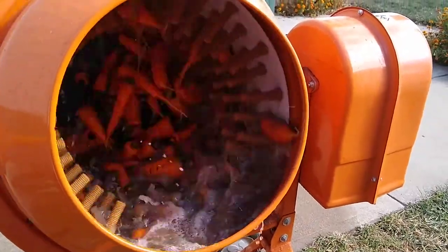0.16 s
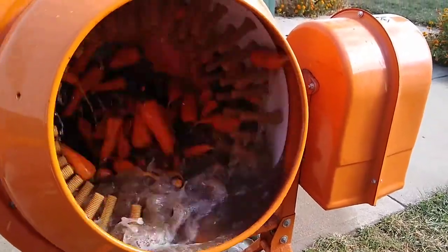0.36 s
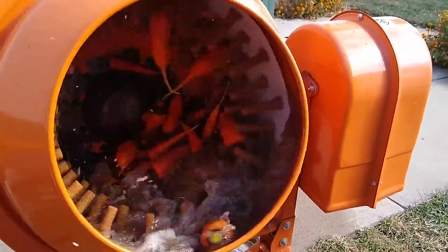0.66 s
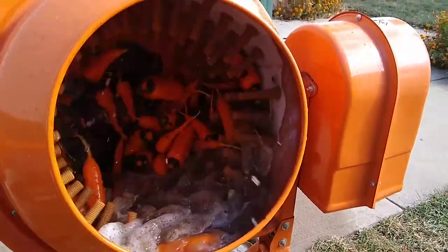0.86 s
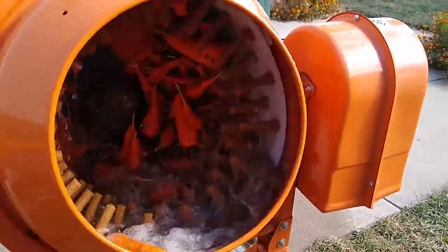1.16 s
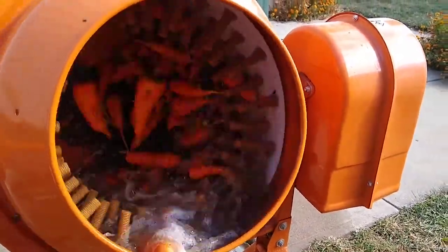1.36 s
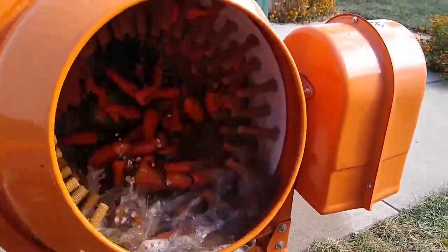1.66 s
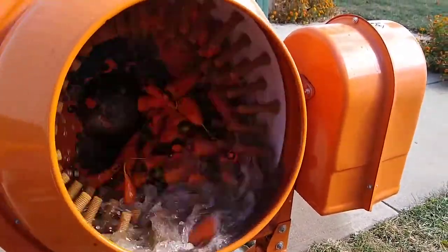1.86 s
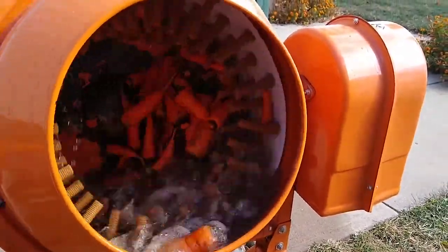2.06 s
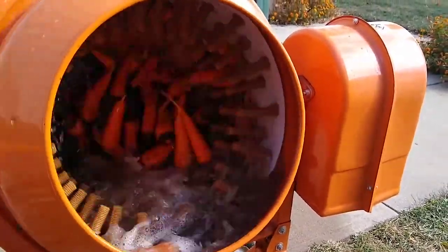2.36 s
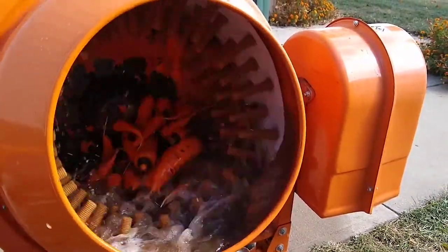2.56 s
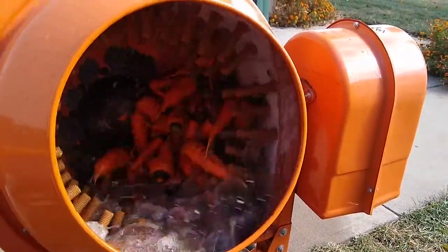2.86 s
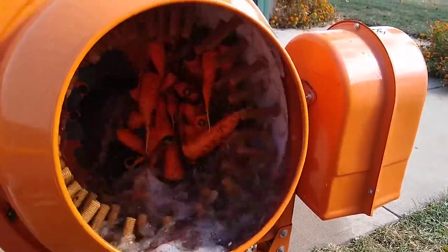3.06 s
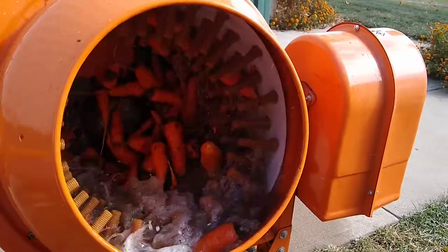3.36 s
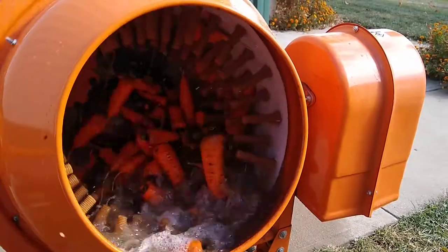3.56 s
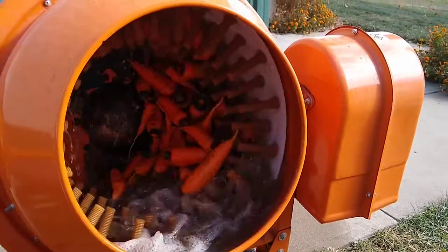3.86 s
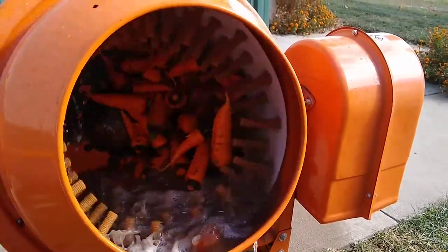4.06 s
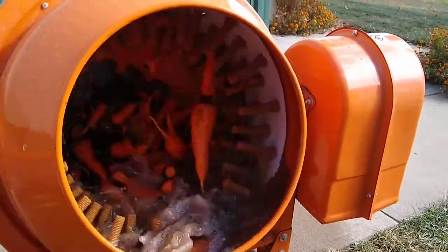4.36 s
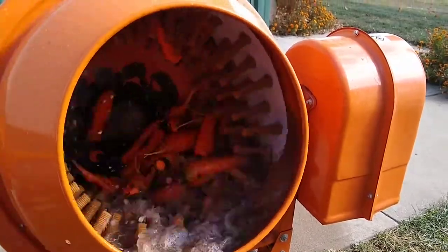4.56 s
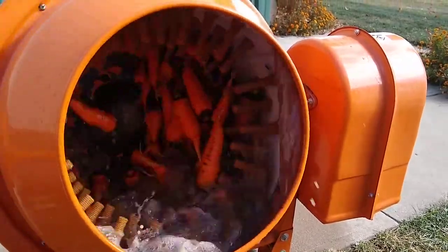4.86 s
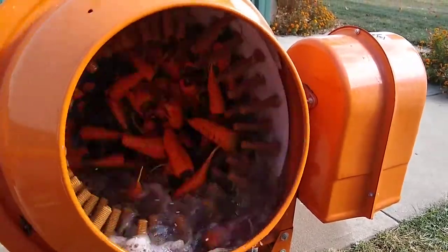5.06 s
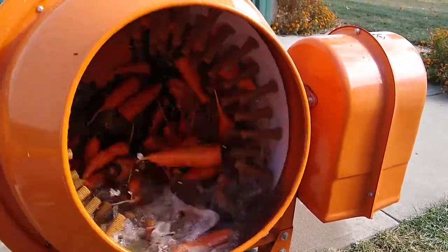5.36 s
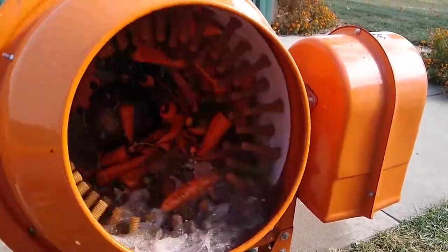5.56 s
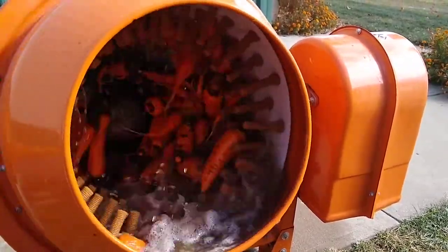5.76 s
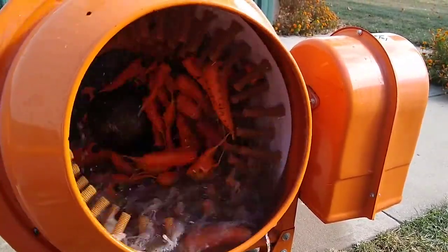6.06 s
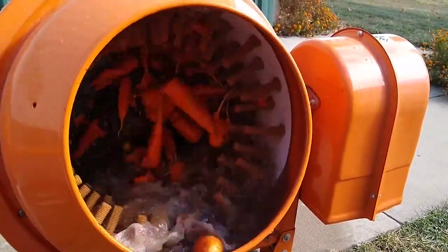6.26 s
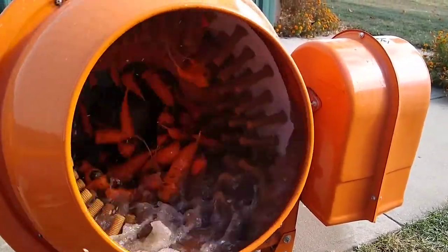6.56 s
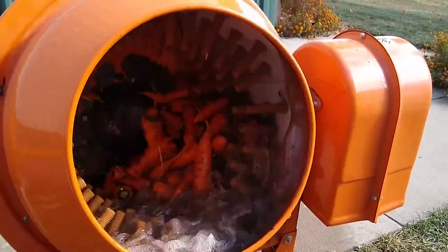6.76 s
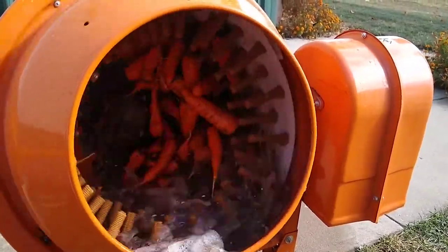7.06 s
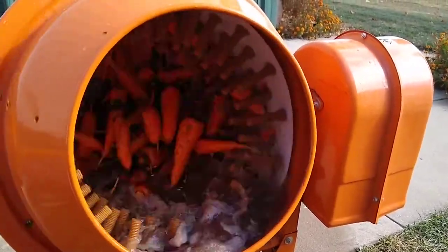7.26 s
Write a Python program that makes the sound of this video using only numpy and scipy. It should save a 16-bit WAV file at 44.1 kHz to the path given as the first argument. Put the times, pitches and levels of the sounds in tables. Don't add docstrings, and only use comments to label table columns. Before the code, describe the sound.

From 0 to 7.4 seconds a motorised steel mixer drum full of carrots and water turns outdoors, heard very close in stereo. Fast gear teeth, around 55 a second, make a rough, dry clatter strongest around 1 to 3 kHz, with hollow sheet-metal boom between 300 and 700 Hz. Loose stumbles open, then hard grinding pushes come from about 0.4 to 1.6 seconds, roughly every 0.18 seconds. It loosens and stumbles from 1.7 to 2.5, grinds hard 2.6 to 3.6, eases until 4.2, pounds again 4.3 to 5.6, stumbles to 6.2 and grinds to the end. Heavy roots thud low, clearest near 1.9 and 5.8, mostly in the looser passages. Fine water spray and slosh follow the jolts quietly. Lumpy wind presses the microphone, strongest near 1.9 and 5.8 seconds.

```python
import sys
import numpy as np
from scipy import signal
from scipy.fft import rfft, irfft, next_fast_len
from scipy.io import wavfile

SR = 44100
rng = np.random.default_rng(int(sys.argv[2]) if len(sys.argv) > 2 else 0)


def undo_db(level):
    steps = np.asarray(level, float) / 20
    return 10 ** steps


def inscribe(sig):
    pcm = np.round(np.clip(np.atleast_2d(sig).T, -1, 1) * 32767)
    wavfile.write(sys.argv[1], SR, pcm.astype(np.int16))


N = 327222
TIME = np.arange(N) / SR
SIZE = next_fast_len(N + SR // 2)
HZ = np.maximum(np.arange(SIZE // 2 + 1) * SR / SIZE, 1)
TEETH_PER_S, FIRST_TOOTH_S = 54.905, 0.002
DRUM_TURN_S = 1.968


def rms_one(x):
    return x / np.sqrt(np.mean(x ** 2) + 1e-20)


def in_time(rows):
    s, *columns = np.transpose(rows)
    return [np.interp(TIME, s, c) for c in columns]


def over_hz(points):
    hz, *columns = np.transpose(points)
    return [np.interp(np.log(HZ), np.log(hz), c) for c in columns]


def colour(x, points):
    gain = rms_one(undo_db(over_hz(points)[0]))
    return irfft(rfft(x, SIZE) * gain, SIZE)[..., :N]


def drift(rate_hz):
    r = np.exp(-80 * np.pi * rate_hz / SR)
    noise = rng.standard_normal(N // 40 + 2002)
    slow = signal.lfilter([1], [1, -2 * r, r * r], noise)[2000:]
    return np.interp(np.arange(N) / 40, np.arange(len(slow)), rms_one(slow))


def grains(per_s, spread_db):
    draw = rng.random((2, N))
    born = draw < per_s / SR
    luck = draw[born] * SR / per_s
    size = undo_db(spread_db * np.minimum(-np.log(luck + 1e-12), 5))
    out = np.zeros((2, N))
    out[born] = size * np.where(np.arange(luck.size) % 2, 1, -1)
    return rms_one(out)


def dying(at_s, level_db, rise_s, decay_s):
    marks = np.zeros(N)
    at = np.clip((at_s * SR).astype(int), 0, N - 1)
    np.add.at(marks, at, undo_db(2 * level_db))
    fall, rise = np.exp(-2 / (decay_s * SR)), np.exp(-1 / (rise_s * SR))
    decays = signal.lfilter([1], [1, -fall], marks)
    return signal.lfilter([1 - rise], [1, -rise], decays)


def turn_swing(peak_s):
    return np.cos(2 * np.pi * (TIME - peak_s) / DRUM_TURN_S)


# [t/s, length/s, start level/dB, end level/dB]
TIGHT_PUSHES = [(0.371, 0.4, -16.5, -19), (0.576, 0.12, -13, -15), (0.792, 0.12, -14, -15.5),
                (0.947, .13, -12, -14.5), (1.145, 0.12, -10, -19.5), (1.324, 0.12, -12, -14.5),
                (1.492, .125, -13, -14.5), (2.598, 0.085, -11, -17), (2.767, 0.13, -12.5, -15.5),
                (2.966, 0.12, -11.5, -16), (3.142, .13, -12, -14.5), (3.329, 0.11, -12, -14),
                (3.517, 0.071, -11.5, -17), (4.278, 0.16, -11, -24.5), (4.448, 0.11, -13.5, -14.5),
                (4.601, 0.11, -11.5, -22.5), (4.769, .14, -13, -16), (4.976, 0.12, -11.5, -18),
                (5.153, .13, -10.5, -16.5), (5.311, .13, -13, -14.5), (5.522, 0.082, -10, -23),
                (6.247, 0.049, -12.5, -14), (6.447, 0.091, -13.5, -15.5), (6.585, 0.16, -16.5, -18.5),
                (6.79, 0.12, -11, -15.5), (6.964, 0.13, -13, -14.5), (7.158, 0.11, -12, -14),
                (7.334, 0.069, -11, -14.5)]
# [t/s, length/s, start level/dB, end level/dB]
LOOSE_STUMBLES = [(0.064, 0.047, -15, -17.5), (0.208, 0.12, -18, -20.5), (.749, 0.018, -21, -28),
                  (1.666, 0.043, -12.5, -29), (1.874, 0.1, -18, -20.5), (2.028, 0.046, -15, -26),
                  (2.179, 0.018, -16.5, -20), (2.254, 0.077, -16.5, -19.5), (2.34, 0.1, -14.5, -20.5),
                  (2.48, 0.12, -18, -20), (3.856, 0.063, -17, -18), (4.045, 0.044, -18, -28),
                  (4.146, 0.052, -17, -23), (4.224, 0.053, -18, -27), (5.735, 0.019, -16, -25),
                  (5.842, 0.044, -17, -19.5), (5.913, 0.092, -22.5, -24), (6.1, .075, -15.5, -17.5),
                  (6.209, 0.018, -9, -22), (6.382, 0.053, -17, -31), (7.122, 0.035, -12.5, -25)]


def grind():
    idle_db, attack_s, release_s = -23, 0.006, 0.021
    swell_s_per_db = 0.13
    power = np.full(N, undo_db(2 * idle_db))
    for s, length, start_db, end_db in TIGHT_PUSHES + LOOSE_STUMBLES:
        near = slice(int(s * SR), int((s + length + 8 * release_s) * SR))
        age = TIME[near] - s
        rise_s = attack_s + swell_s_per_db * max(end_db - start_db + 2, 0)
        shape = np.clip(age / rise_s, 0, 1) * np.exp(-np.maximum(age - length, 0) / release_s)
        push_db = np.interp(age, [0, length], [start_db, end_db])
        power[near] += (shape * undo_db(push_db)) ** 2
    return 10 * np.log10(power)


def bites_of_load():
    s, _, start_db, end_db = np.transpose(TIGHT_PUSHES + LOOSE_STUMBLES)
    gentle_db = 1.8 * np.maximum(end_db - start_db + 6, 0)
    return s, -11.5 + 0.6 * (start_db + 13) - gentle_db


def slack():
    at_s, peak_db = bites_of_load()
    marks = np.zeros(N)
    marks[(at_s * SR).astype(int) - 60] = np.clip((peak_db + 68) / 10, 0, 1)
    growth = np.exp(-1 / (0.089 * SR))
    return signal.lfilter([1], [1, -growth], marks[::-1])[::-1]


def slamming_teeth(grind_db):
    spread_db, jitter_s = 4.5, 0.0015
    s = FIRST_TOOTH_S + np.arange(int(N / SR * TEETH_PER_S)) / TEETH_PER_S
    luck = rng.random((len(s), 2))
    level_db = -8 + 2 * (np.interp(s, TIME, grind_db) + 14.5) + spread_db * np.log(luck[:, 0])
    return s + jitter_s * (2 * luck[:, 1] - 1), level_db


def knocks(clicks, cycles):
    pitches_hz, dealt = np.geomspace(700, 6500, 14), rng.integers(0, 14, N)
    out = 0
    for k, hz in enumerate(pitches_hz):
        r, w = undo_db(-60 * hz / (cycles * SR)), 2 * np.pi * hz / SR
        struck = clicks * (dealt == k) + 1e-18
        out = out + np.sqrt(hz) * signal.lfilter([np.sin(w)], [1, -2 * r * np.cos(w), r * r], struck)
    return rms_one(out)


# [t/s, peak level/dB]
WALL_FLARES = [(.66, -17), (.98, -14), (1.35, -30), (1.54, -16), (2.25, -20.5), (2.61, -17), (3.02, -17),
               (3.19, -20), (3.358, -15.5), (3.53, -16.5), (4.31, -23), (4.95, -24), (5.02, -20),
               (5.54, -18), (6.5, -22), (7.02, -20), (7.21, -36), (7.38, -20)]


def boom_level(grind_db):
    lag = np.exp(-1 / (0.005 * SR))
    trailing_db = 0.66 * signal.lfilter([1 - lag], [1, -lag], grind_db + 14)
    boom_db = -22.5 + 0.5 * turn_swing(1.746) + 2.25 * drift(5) + trailing_db
    flares = dying(*np.transpose(WALL_FLARES), rise_s=0.0033, decay_s=0.021)
    return 10 * np.log10(undo_db(2 * (boom_db - 2.5)) + flares)


# [f/Hz, density level/dB]
CLATTER_COLOUR = [(300, -11), (600, -31), (800, -9.5), (1300, -2.5), (1650, 0), (1900, -3), (2600, -6),
                  (3100, -9.5), (3600, -14.5), (5000, -23), (5900, -26), (6800, -35.5), (9000, -40),
                  (16000, -61)]
# [f/Hz, density level/dB]
SLAM_COLOUR = [(500, -17), (900, -13), (1400, 7), (1900, -1), (3000, 6), (3700, -4.5), (5000, -35),
               (5900, -9.5), (7000, -22), (16000, -55)]
# [f/Hz, density level/dB]
BOOM_COLOUR = [(200, -42), (320, -8.5), (410, -4), (480, 3), (560, -2), (660, 0), (780, -7.5), (1000, -32)]


def gear(grind_db, teeth):
    grind_db = grind_db - 1.3 * slack()
    boom_db = boom_level(grind_db)
    since_tooth = (TIME - FIRST_TOOTH_S) * TEETH_PER_S % 1
    tightness = np.clip((grind_db + 13.5) / 11, 0.1, 1.2)
    jolt_db = 10.5 * tightness * (np.exp(-since_tooth / 0.35) - 0.4)
    mesh_db = jolt_db + 0.86 * drift(6.1)
    bites = dying(*bites_of_load(), rise_s=0.00017, decay_s=0.0097)
    clatter = np.sqrt(undo_db(2 * (grind_db + mesh_db - 6.5)) + undo_db(-55) * bites)
    slams = np.sqrt(dying(*teeth, rise_s=0.0013, decay_s=0.0074))
    rattle = grains(5000, spread_db=2.5) + undo_db(-5.5) * knocks(grains(1200, spread_db=1.5), cycles=33.2)
    boom = undo_db(boom_db - 3.5 + 1.3 * mesh_db) * grains(1500, spread_db=1.5)
    return (colour(clatter * rattle, CLATTER_COLOUR)
            + colour(undo_db(-5.5) * slams * grains(9000, spread_db=2.5), SLAM_COLOUR)
            + colour(boom, BOOM_COLOUR))


# [f/Hz, width/Hz, lift level/dB]
SHELL_MODES = [(136.8, 7.9, 12.8), (163.3, 6.1, 13.4), (222, 26, 9.6), (265.4, 14, 11.85), (318, 50, 5.4),
               (359, 53, 9.4), (411, 57, 8.8), (472.7, 33, 12.75), (518, 22, 6.3), (602.4, 32, 7.4),
               (816, 17, 4.2), (907, 16, 10.8), (1103, 130, 5.3), (1290, 86, 6.03), (1454, 23, 0.57),
               (3040, 26, 1), (3130, 200, 2.25)]


def steel_shell(x):
    delay, gain = np.exp(-2j * np.pi * HZ / SR), 1
    for hz, width_hz, lift_db in SHELL_MODES:
        r = np.exp(-np.pi * width_hz / SR)
        poles = 1 - 2 * r * np.cos(2 * np.pi * hz / SR) * delay + (r * delay) ** 2
        ring = (1 - r * r) / 2 * (1 - delay ** 2) / poles
        gain = gain + (undo_db(lift_db) - 1) * ring
    return irfft(rfft(x, SIZE) * gain, SIZE)[:, :N]


# [t/s, peak level/dB]
ROOT_DROPS = [(1.76, -31), (1.879, -19.5), (2.02, -30), (2.17, -29.5), (2.36, -32), (3.83, -32),
              (3.92, -28), (4.12, -30.5), (5.2, -38), (5.72, -48), (5.83, -23.5), (6.36, -44), (6.8, -32)]
# [f/Hz, density level/dB]
THUD_COLOUR = [(70, -30), (105, 0), (135, -5), (165, -4), (230, -22), (500, -45)]


def root_thuds():
    thumps = dying(*np.transpose(ROOT_DROPS), rise_s=0.0035, decay_s=0.13)
    return undo_db(-8) * colour(np.sqrt(thumps) * rng.standard_normal((2, N)), THUD_COLOUR)


# [f/Hz, density level/dB]
RUMBLE_COLOUR = [(50, -29.5), (95, -24), (130, -9), (170, -9), (200, -15.5), (300, -16.5), (450, -20),
                 (750, -18), (1300, -31.5), (2000, -47)]


def frame_rumble():
    rumble_db = -34 + turn_swing(2.26)
    return undo_db(rumble_db + 1.5) * colour(grains(900, spread_db=1.5), RUMBLE_COLOUR)


# [t/s, level/dB]
WATER_CHURN = [(0, -48.5), (.6, -54), (1.1, -53), (2.1, -54), (2.6, -50.5), (3.1, -58), (4.0, -56),
               (4.7, -52), (5.8, -55), (6.5, -52), (7.42, -60)]


def splash_level(grind_db, teeth):
    shaken_db = 0.1 * (grind_db - grind_db.mean())
    blows = dying(*teeth, rise_s=0.0005, decay_s=0.006)
    thrown_db = 0.85 * 10 * np.log10(1 + undo_db(38) * blows)
    return in_time(WATER_CHURN)[0] + shaken_db + thrown_db


# [f/Hz, density level/dB]
SPLASH_COLOUR = [(1500, 21.5), (3000, 33), (5000, 24), (7000, -16), (9000, -13), (12000, 7), (14000, -16),
                 (16000, -22.5)]
# [f/Hz, density level/dB]
FAR_HISS_COLOUR = [(5000, -4), (8500, -10), (10500, -6.5), (13000, -5), (16000, -11)]


def water(splash_db, spectrum):
    spray = undo_db(-2 + 4 * drift(14)) * grains(5000, spread_db=4)
    wash = undo_db(-0.5) * rng.standard_normal((2, N))
    return undo_db(splash_db + 2.2 * drift(27)) * colour(spray + wash, spectrum)


# [t/s, level/dB]
WIND_GUSTS = [(0, -55), (.4, -55), (1.3, -53), (1.9, -49), (2.3, -55), (2.7, -56), (3.3, -57), (3.8, -56),
              (4.4, -57), (5.2, -64), (5.8, -44), (6.6, -48), (7.42, -56)]
# [f/Hz, density level/dB]
WIND_COLOUR = [(20, -34), (45, -9), (80, 5.5), (130, 8), (200, 2.5), (350, -35)]


def wind():
    gust_db = in_time(WIND_GUSTS)[0] + 18.5 + 4 * drift(12)
    return undo_db(gust_db) * colour(rng.standard_normal(N), WIND_COLOUR) * [[1], [-0.75]]


# [f/Hz, side level/dB, likeness of the ports 0-1]
PORT_PAIR = [(100, -14, 0.7), (200, -4, 1), (476, -10, 0.82), (1020, -10.5, 1), (1250, -6.5, 0),
             (1780, -6, 0.97), (2500, 0, 0.64), (4000, 0.5, 0.8), (7000, -1.5, 0.1), (10000, -2, .3),
             (16000, 0, .1)]


def ports(pair):
    comb_hz, leak_db = 2192, -15.5
    side_db, alike = over_hz(PORT_PAIR)
    alike = np.clip(alike, 0, 1)
    one, other = rfft(pair, SIZE)
    turn = np.pi * HZ / comb_hz
    low = turn < np.pi / 2
    mid = 1j * np.where(low, 1, np.sin(turn)) * one + 1j * undo_db(leak_db) * other
    mixed = alike * one + np.sqrt(1 - alike ** 2) * other
    side = undo_db(side_db) * np.cos(turn) * np.where(low, 1, -1) * mixed
    side = side + undo_db(leak_db - 26) * undo_db(side_db) * other
    side -= 0.12j * low * np.cos(turn) * one
    return irfft(-1j * np.array([mid + side, mid - side]), SIZE)[:, :N]


def scene():
    grind_db = grind()
    teeth = slamming_teeth(grind_db)
    splash_db = splash_level(grind_db, teeth)
    drum = steel_shell(gear(grind_db, teeth) + frame_rumble() + root_thuds())
    no_deep_bass = signal.butter(4, 90, "high", fs=SR, output="sos")
    drum = signal.sosfilt(no_deep_bass, drum)
    near = ports(drum + water(splash_db + 9.5, SPLASH_COLOUR))
    return near + water(splash_db + 10, FAR_HISS_COLOUR) + wind()


def low_pass(x):
    return signal.sosfilt(signal.butter(12, 16570, fs=SR, output="sos"), x)


def record(dry):
    top = 1.3
    rounded = top * np.tanh(dry / top)
    steep = signal.ellip(14, 0.5, 75, 15640, fs=SR, output="sos")
    mix = signal.sosfilt(steep, rounded)
    return low_pass(mix)


dry = scene()
out = record(dry)
inscribe(out)
```